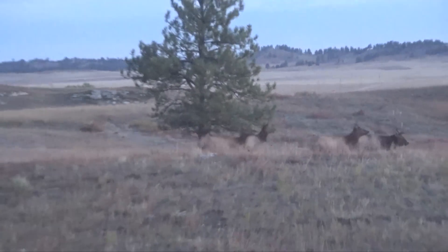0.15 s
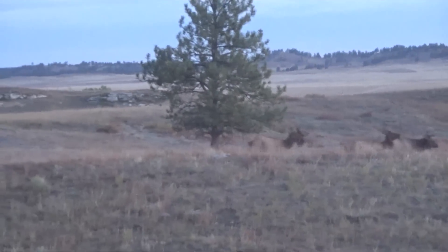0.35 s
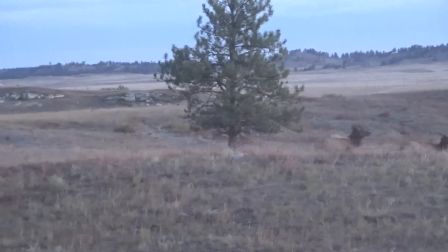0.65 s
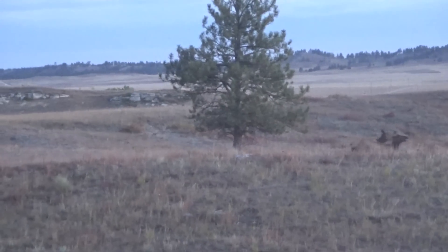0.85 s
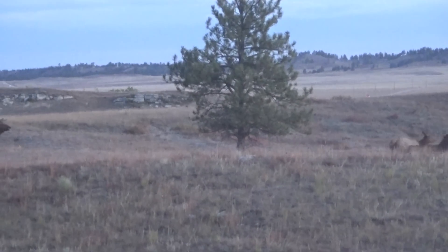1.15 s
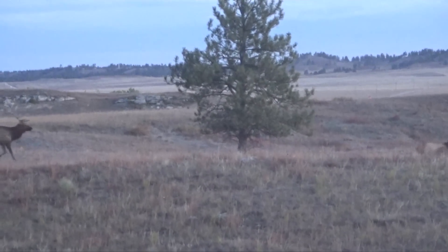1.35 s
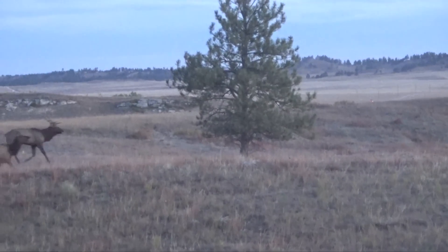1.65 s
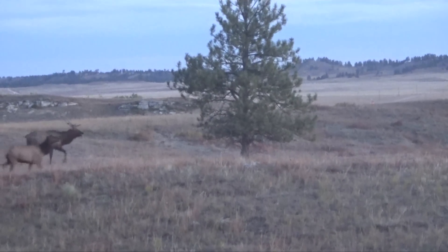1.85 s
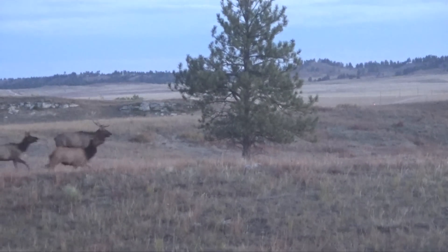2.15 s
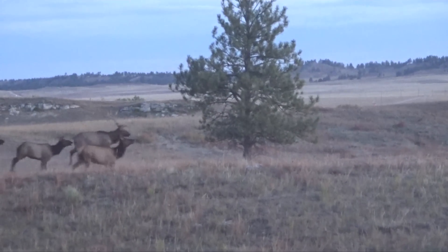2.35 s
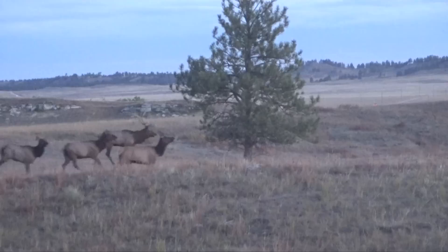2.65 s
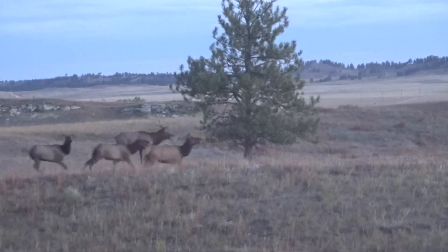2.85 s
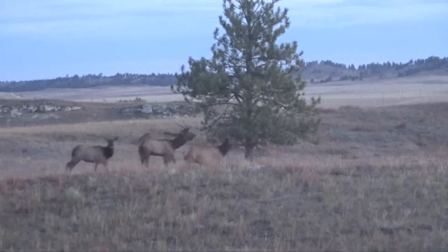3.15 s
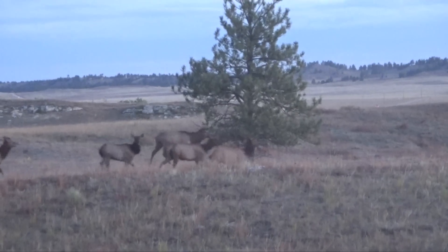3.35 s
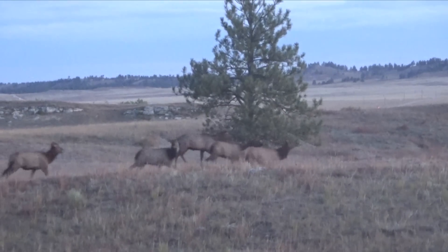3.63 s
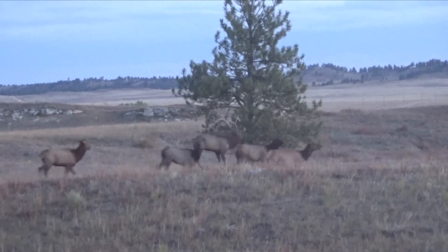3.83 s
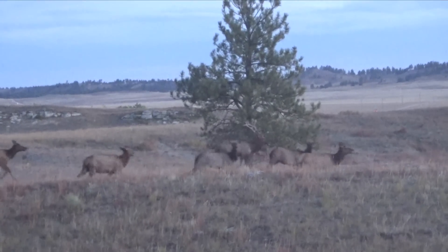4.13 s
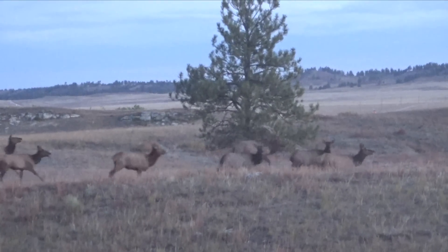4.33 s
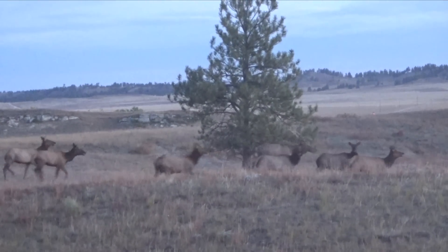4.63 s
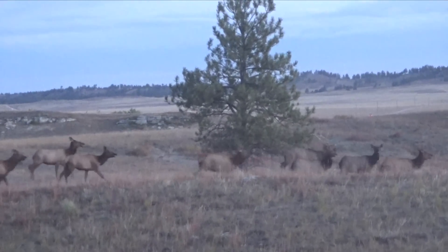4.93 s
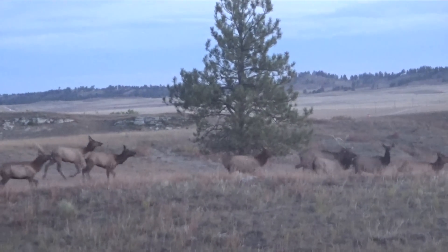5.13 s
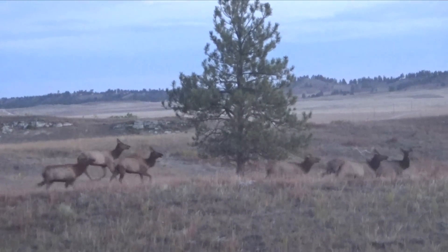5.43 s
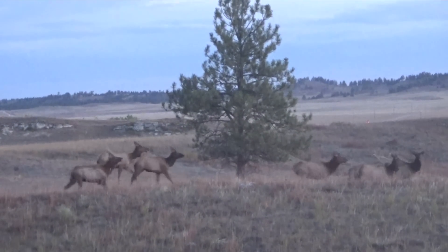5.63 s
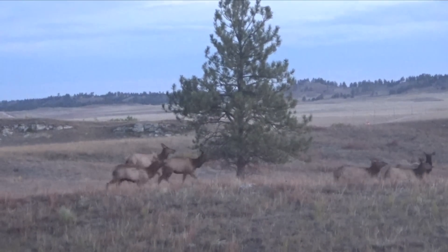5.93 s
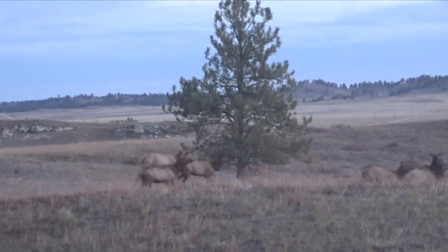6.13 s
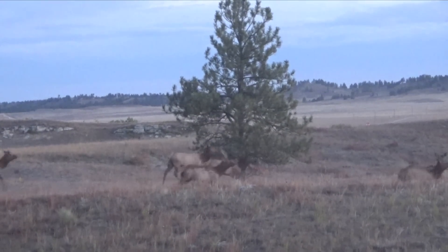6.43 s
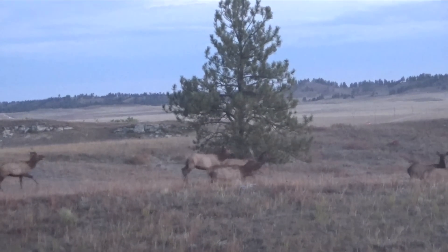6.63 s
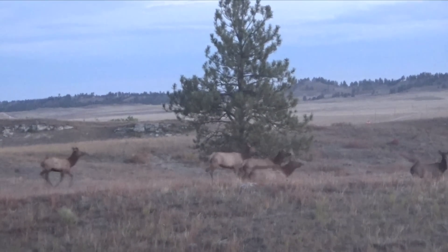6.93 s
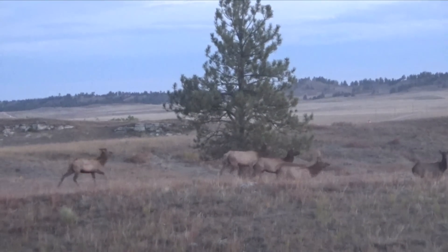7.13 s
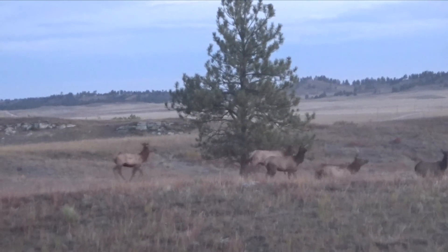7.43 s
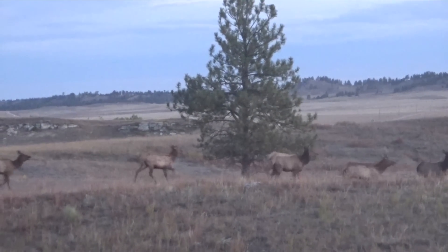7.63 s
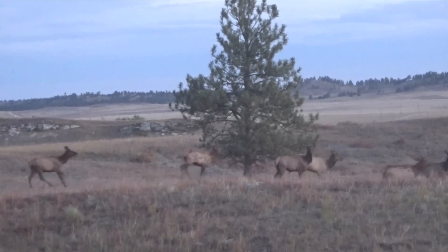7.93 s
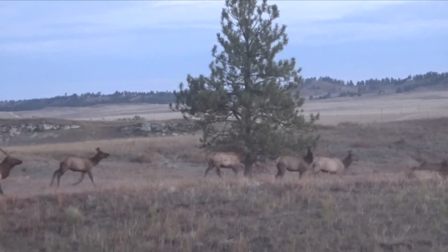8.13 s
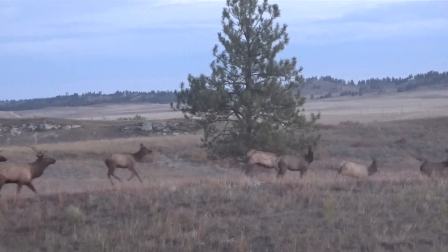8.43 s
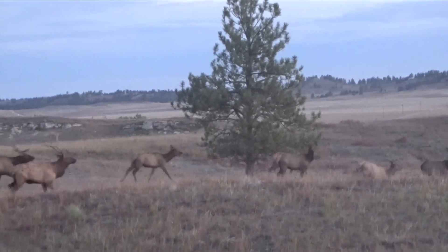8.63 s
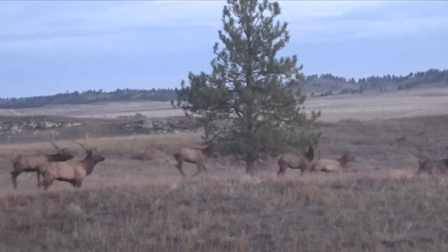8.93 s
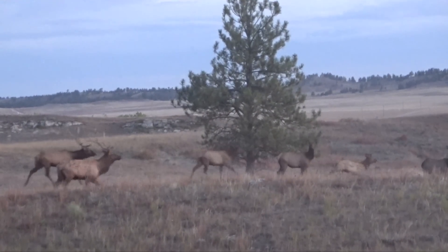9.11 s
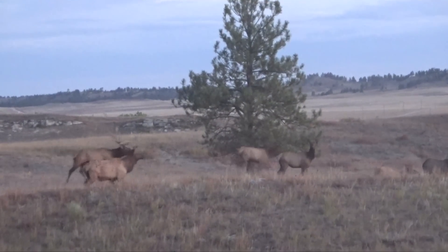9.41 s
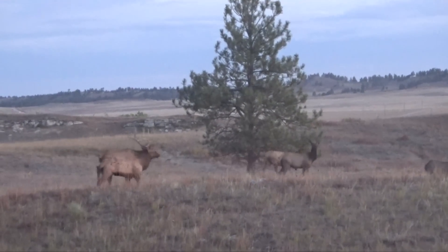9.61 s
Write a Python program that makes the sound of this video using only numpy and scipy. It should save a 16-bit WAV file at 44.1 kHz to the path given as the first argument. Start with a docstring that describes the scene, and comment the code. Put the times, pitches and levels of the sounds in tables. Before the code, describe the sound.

An elk herd trots through dry grass, cows and calves giving high nasal mews that sag at the end, with stalks snapping underfoot.

```python
"""Dry grassland, an elk herd trotting by on the left of a camera. Cows and calves mew: stacked overtones
sweep through fixed throat resonances and sag in pitch at the end. Hooves snap stalks (noise and a ringing knock),
scuff (bursts of grit) and thud (short low tones); the trot is a noise rumble with a crackling grass rustle.
A small bird whistles far off in gliding sine tones; the camera adds hiss and a thin high whine."""
import sys
import numpy as np
from scipy import signal
from scipy.fft import rfft, irfft, next_fast_len
from scipy.io import wavfile
from scipy.ndimage import uniform_filter1d, map_coordinates

SR = 44100
rng = np.random.default_rng(int(sys.argv[2]) if len(sys.argv) > 2 else 0)


def store_pcm(level_fs):
    """Save levels as 16-bit WAV."""
    pcm = np.round(np.clip(level_fs, -1, 1) * 32767).astype(np.int16)
    wavfile.write(sys.argv[1], SR, np.atleast_2d(pcm).T)


N = 430857  # length [samples]

# The mews, each a pair. First its ending:
# (effort as the drop starts [dB], effort as it ends [dB], chest at the start, at the drop, at the end [dB]);
# then its held part: rows of (time [s], pitch [Hz], effort [dB], mouth brightness [dB])
MEWS = [ ((-21, -39, -12.5, -1.5, 6), [(1.421, 1213, -37.5, 10), (1.538, 1333, -30, 5.5),
        (1.546, 1363, -19, 2), (1.65, 1351, -19, 2), (1.76, 1332, -16.5, -17), (1.845, 1175, -17, -26),
        (1.97, 1207, -24, -29), (2.11, 1297, -20, -6.5), (2.2, 1284, -17, -4)]), ((-36, -37, -4, -5, 7),
        [(2.301, 944, -45, -20), (2.389, 1083, -30, -5), (2.454, 1101, -34.5, 4), (2.56, 1075, -29, -30),
        (2.615, 1028, -34, -21), (2.7, 1011, -35, -11), (2.83, 968, -33, -25), (2.979, 1093, -33, 2),
        (3.129, 1052, -27, -20)]), ((-56, -50, 15, 20, 5), [(2.361, 1250, -53, 0), (2.422, 1224, -52, -7),
        (2.502, 1270, -49, -6)]), ((-32, -47, -1, 0.5, 20), [(2.84, 1210, -36.5, -10),
        (2.911, 1246, -28.5, -2), (3.047, 1309, -20, -13.5), (3.205, 1352, -21, -2.5),
        (3.29, 1336, -22.5, -4), (3.372, 1322, -17.5, -25), (3.43, 1264, -18.5, -19),
        (3.49, 1254, -19.5, -29), (3.532, 1177, -26, -9)]), ((-35, -44, -3, -9, 15), [(4.151, 958, -50, -5),
        (4.2, 1055, -42, -16), (4.27, 1119, -42, -18), (4.326, 1194, -31.5, -4), (4.402, 1178, -31, -9),
        (4.48, 1032, -32, -8), (4.56, 1023, -27, -14)]), ((-59, -54, 18, 3, 9), [(4.731, 917, -59, 7),
        (4.835, 954, -61, 10), (4.957, 942, -53, -7)]), ((-19.5, -45.5, 7, -8, 29.5),
        [(5.561, 1215, -44.5, -12), (5.665, 1323, -26.5, -11), (5.811, 1366, -23, 0),
        (5.93, 1359, -24.5, -3), (6.052, 1315, -22.5, -9.5), (6.156, 1366, -24, -3),
        (6.244, 1307, -20.5, -12), (6.35, 1285, -20, -9.5), (6.45, 1248, -16.5, -27)]),
        ((-25.5, -37.5, -9, -10, -13.5), [(6.501, 1686, -29, -10), (6.579, 1758, -39.5, 1),
        (6.677, 1717, -31, -9), (6.78, 1527, -43.5, 4), (6.9, 1395, -40, -19), (7.05, 1698, -31, -11),
        (7.182, 1780, -35.5, -5), (7.301, 1780, -34.5, 4), (7.377, 1693, -24, -10),
        (7.439, 1490, -30.5, -12)]), ((-34, -40.5, -2, 11.5, 22), [(7.082, 1159, -45, -7),
        (7.13, 1227, -39.5, 2), (7.234, 1256, -29.5, 1), (7.381, 1278, -23, -3), (7.47, 1240, -23.5, 1),
        (7.54, 1149, -29.5, -1), (7.601, 1066, -38, 5), (7.655, 1064, -36.5, -7)]),
        ((-46, -65, 7.5, 5.5, 4), [(8.291, 1002, -43, -6), (8.333, 1190, -49, 9), (8.461, 1203, -39.5, -2),
        (8.537, 1172, -41, 6), (8.62, 1110, -41, -30), (8.72, 1048, -38.5, -22), (8.78, 1010, -40, -22)]),
        ((-40, -46, 8, -2, -10), [(9.111, 485, -56, -25), (9.175, 740, -45, -20), (9.209, 880, -39, -11),
        (9.243, 916, -38.5, -35), (9.337, 905, -38, -32), (9.39, 871, -35.5, -18)]), ]
# The sag that ends each mew: (start time [s], start pitch [Hz], end time [s], end pitch [Hz])
DROPS = [(2.261, 1211, 2.313, 655), (3.19, 1000, 3.299, 401), (2.55, 1230, 2.618, 1140),
         (3.556, 1060, 3.6, 585), (4.623, 936, 4.669, 634), (5.12, 835, 5.198, 806),
         (6.477, 1160, 6.528, 610), (7.479, 1122, 7.592, 420), (7.677, 1030, 7.716, 640),
         (8.845, 995, 8.88, 855), (9.47, 709, 9.68, 315)]
# Which mews come from the nearest cow: (index in MEWS)
NEAR_COW = (0, 3, 6, 8)
# Resonances of throat and mouth: (frequency [Hz], gain [dB])
THROAT = [(500, -22), (900, -29.5), (1300, -8.5), (1700, -13.5), (2050, -13.5), (2400, -10.5), (2800, 3),
          (3050, -3), (3350, -16), (3650, -12), (4050, -3), (4400, -19), (4750, -33.5), (5300, -16),
          (5650, -23), (6000, -28), (6500, -54.5), (8000, -60.5)]
# The other callers' throats against hers: (frequency [Hz], added gain [dB])
OTHER_THROATS = [(1250, -0.5), (1450, -22), (1600, -18.5), (1760, 2.5), (2000, 1.5), (3000, -1), (3350, -7),
                 (3700, 3.5), (4050, -12.5), (4500, -1), (5200, 1), (5600, -0.5), (5950, -7), (6400, 2)]
# How much of the mouth brightness an overtone takes: (frequency [Hz], share [0-1])
MOUTH = [(2800, 0.024), (5300, 1), (6000, 0.3)]
# Stereo tilt of the callers: (frequency [Hz], left over right [dB])
HERD_SIDE = [(100, 2), (1290, 5), (2900, 4.5), (3600, 1.5), (8000, 0.7)]
# Stalks snapping under hooves:
# (time [s], level before trim [dB], knock frequency [Hz], crack level before trim [dB])
SNAPS = [(0.176, -16.5, 1310, -16), (0.1867, -28.5, 1270, -20), (0.5868, -26, 4350, -30),
         (0.6238, -30, 1700, -29), (0.647, -35, 2800, -27), (1.365, -21, 1590, -31),
         (3.6225, -35.5, 2620, -7), (4.0756, -39, 1200, -21), (4.174, -34, 2940, -25),
         (4.722, -33, 2770, -17), (5.2886, -35, 2240, -9), (5.89, -29, 2820, -26), (7.7468, -32, 1210, -30),
         (7.79, -35.5, 1840, -23), (7.9096, -33, 1630, -33), (8.098, -39.5, 2780, -28),
         (8.3621, -37, 1200, -3.5), (8.4994, -33, 1240, -25)]
# Hooves dragged through dirt and stalks:
# (time [s], level before trim [dB], length [s], centre frequency [Hz])
SCUFFS = [(0.694, -46, 0.042, 1690), (1.259, -45, 0.019, 1600), (1.361, -40, 0.05, 1570),
          (2.317, -43.5, 0.05, 1600), (4.288, -46, 0.16, 2150), (5.097, -50.5, 0.28, 1120),
          (7.581, -44.5, 0.09, 1110), (7.903, -50, 0.042, 2180), (8.15, -43, 0.12, 1850),
          (8.73, -42.5, 0.069, 1330)]
# Single hoof thuds: (time [s], level before trim [dB], frequency [Hz])
THUDS = [(0.236, -36, 151), (2.921, -36.5, 191), (3.036, -38, 230), (3.656, -30, 215), (4.303, -35, 172),
         (6.734, -29.5, 141), (8.137, -36, 110), (8.812, -35.5, 128)]
# The trot of the whole herd: (time [s], ground rumble before trim [dB], grass rustle before trim [dB])
TROT = [(0, -51, -54.5), (1.2, -48, -52.5), (2.5, -49, -52), (3.4, -48, -54.5), (4.3, -50.5, -53.5),
        (4.9, -52, -54.5), (5.3, -47.5, -55), (5.8, -53.5, -57.5), (6.8, -51.5, -54.5), (7.6, -53, -56.5),
        (8.2, -52, -57.5), (9, -53, -58.5), (9.77, -51.5, -57)]
# Colour of the ground rumble: (frequency [Hz], relative density [dB per Hz])
GROUND = [(15, -53.5), (28, -13.5), (100, 0.5), (180, 2.5), (290, -10.5), (500, -13), (700, -49.5)]
# Colour of the grass rustle: (frequency [Hz], relative density [dB per Hz])
GRASS = [(150, -30.5), (250, -3), (740, -3), (1640, -4.5), (2410, -8), (3280, -8), (5250, -16), (8270, -19),
         (15600, -43.5)]
# Stereo tilt of the hooves and trot: (frequency [Hz], left over right [dB])
FIELD_SIDE = [(30, 0), (200, 2), (600, 1.3), (2400, 2.2), (4400, .6), (9000, .2)]
# Bird whistles:
# (time [s], length [s], first pitch [Hz], turning pitch [Hz], last pitch [Hz], level [dB])
BIRD_WHISTLES = [(.99, .12, 7293, 7900, 8695, -63), (1.12, .1, 7983, 8251, 7094, -64),
                 (5.15, .16, 7291, 7911, 7157, -63), (3.12, .18, 8100, 7900, 7200, -62)]
# Colour of the hiss: (frequency [Hz], relative density [dB per Hz])
HISS = [(300, -5), (2000, 0.5), (6000, 3.5), (10000, 2.5), (15700, 0)]
# Level of the whine: (time [s], level [dB])
WHINE = [(0, -64), (1, -72), (1.9, -77.5), (6.8, -88.5), (7.6, -73), (8.5, -86), (9.2, -86), (9.5, -74)]

GLIDE_S = 0.05  # smoothing of the held pitch [s]
DULLING_DB = -5.5  # change by the end of the near cow's drop, per overtone above the third [dB]
BIRD_TURN = 0.3  # where a whistle's pitch turns [share of its length]
WHINE_HZ, TOP_HZ = 13264, 15750  # whine pitch and upper band limit [Hz]


def mews():
    """Steady vocal folds: each overtone takes the throat's gain at its own frequency, and the pitch sags last."""
    out = np.zeros(N)
    overtone = np.arange(1, 13)[:, None]
    for index, ((drop_db, end_db, *chest_dbs), held) in enumerate(MEWS):
        drop_s, drop_hz, end_s, end_hz = DROPS[index]
        last_bright_db = held[-1][3]
        ending = [(drop_s, drop_hz, drop_db, last_bright_db), (end_s, end_hz, end_db, last_bright_db)]
        t, edge = span(held + ending)
        pitch, effort_db, bright_db = curves(held + ending, t)
        chest_db = np.interp(t, [t[0], drop_s, end_s], chest_dbs)

        # held notes bend slowly, the drop keeps its quicker fall
        held_share = np.clip((drop_s - t) / GLIDE_S - 1, 0, 1)
        slow_pitch = uniform_filter1d(pitch, round(GLIDE_S * SR), mode="nearest")
        pitch += held_share * (slow_pitch - pitch)
        pitch = uniform_filter1d(pitch, 800, mode="nearest")
        pitch *= 1 + 0.0015 * wobble(40.3, size=len(t))
        hz = overtone * pitch

        chest_share = np.clip(np.log2(2000 / hz), 0, 1)  # none above 2 kHz, all of it below 1 kHz
        colour_db = chest_db * chest_share + bright_db * along(MOUTH, hz)
        if index in NEAR_COW:
            drop_progress = np.clip((t - drop_s) / (end_s - drop_s), 0, 1)
            colour_db += DULLING_DB * np.maximum(overtone - 3, 0) * drop_progress
        else:
            # from afar each overtone comes and goes
            fading_db = 2.0 * np.array([wobble(7.13, size=len(t)) for _ in overtone])
            colour_db += along(OTHER_THROATS, hz) + fading_db

        # moving air and ground echoes on the way
        flutter_db = 0.9 * np.array([wobble(25, size=len(t)) for _ in overtone])
        gain = amp(effort_db + flutter_db + along(THROAT, hz) + colour_db) * (hz < 9000)
        start_phase = rng.uniform(0, 2 * np.pi, overtone.shape)
        phase = overtone * np.cumsum(2 * np.pi * pitch / SR) + start_phase
        voice = np.sum(gain * np.sin(phase), axis=0)
        add(out, t[0], np.sqrt(2) * edge * voice)
    return sides(out, HERD_SIDE)


def hooves():
    """Single hoof sounds: stalks snap, dirt is scraped and the ground thuds."""
    out = np.zeros(N)
    t = np.arange(SR // 3) / SR
    snaps(out, t)
    scuffs(out, t)
    thuds(out, t)
    return sides(out, FIELD_SIDE)


def snaps(out, t):
    """A breaking stalk gives a ringing, noisy knock and a brighter crack that dies sooner."""
    attack = 1 - np.exp(-t / 0.00039)
    for s, db, hz, crack_db in SNAPS:
        noise = rng.standard_normal((2, len(t)))
        body = unit(steep_band(noise[0], hz, width=1.94))
        ring = 1.25 * np.sin(2 * np.pi * hz * t)
        knock = (body + ring) * amp(-60 * t / 0.026)  # down 60 dB in 26 ms
        crack = unit(band(noise[1], 6500, width=1.3)) * amp(crack_db + 7.5 - 60 * t / 0.016)
        add(out, s, amp(db - 6.5) * (knock + crack) * attack)


def scuffs(out, t):
    """A dragged hoof is a swell of uneven grit noise in two overlapping bands."""
    for s, db, length, hz in SCUFFS:
        grit = rng.standard_normal(len(t)) * amp(3.5 * wobble(150, size=len(t)))
        upper = unit(steep_band(grit, hz, width=1.3))
        lower_hz = 0.7 * hz
        lower = unit(steep_band(upper, lower_hz, width=1.7))
        swell = np.sqrt(np.abs(np.sin(np.pi * np.clip(t / length, 0, 1))))
        add(out, s, amp(db - 4.0) * (upper + lower) * swell)


def thuds(out, t):
    """Soft ground answers a hoof with a few cycles of a low tone that swell and die."""
    for s, db, hz in THUDS:
        u = t * hz / 1.85
        swell = u ** 2 * np.exp(-u ** 2)
        add(out, s, amp(db + 7.0) * swell * np.sin(2 * np.pi * hz * t))


def trot():
    """Many hooves blur into a lumpy noise rumble and a rustle of dry stalks."""
    ground_db, grass_db = curves(TROT, np.arange(N) / SR)
    lumps = rng.standard_normal(N) * amp(2.82 * wobble(14) + 0.57 * wobble(4))
    rustle = rng.standard_normal(N) * amp(1.2 * wobble(9) + 2.33 * wobble(60))
    rustle += 0.39 * unit(crackle(300, spread_db=2.0))
    near = amp(ground_db + 0.5) * unit(filtered(lumps, GROUND))
    near += amp(grass_db + 5) * unit(filtered(rustle, GRASS))

    # the spread-out part, in opposite polarity left and right
    far = rng.standard_normal((2, N))
    wide = amp(ground_db - 23) * unit(filtered(far[0], GROUND))
    wide += amp(grass_db - 21) * unit(filtered(far[1], GRASS))
    return sides(near, FIELD_SIDE) + wide * [[1], [-1]]


def crackle(rate, spread_db):
    """Dry stalks tick at random, rate a second: short damped rings, a few much bigger than the rest."""
    draw = rng.random((round(rate * N / SR), 4))
    t = np.arange(200) / SR
    hz = 1100 * 6 ** draw[:, 1:2]
    size = amp(-spread_db * np.log(draw[:, 2:3] + 0.012))
    size *= hz / 2000  # higher rings start louder and die sooner
    rings = size * np.exp(-t * hz / 3.9) * np.sin(2 * np.pi * hz * t)
    where = (draw[:, :1] * N).astype(int) + np.arange(len(t))
    return np.bincount(where.ravel(), rings.ravel(), N + len(t))[:N]


def bird():
    """Thin pure whistles at an even level, each gliding to a turning pitch and on to its last."""
    out = np.zeros(N)
    for s, length, first_hz, turn_hz, last_hz, db in BIRD_WHISTLES:
        t, edge = span([(s, first_hz), (s + BIRD_TURN * length, turn_hz), (s + length, last_hz)])
        hz = np.interp(t, [s, s + BIRD_TURN * length, s + length], [first_hz, turn_hz, last_hz])
        hz = uniform_filter1d(hz, 1500, mode="nearest")
        whistle = np.sin(np.cumsum(2 * np.pi * hz / SR))
        add(out, t[0], np.sqrt(2) * edge * amp(db) * whistle)
    return out


def camera():
    """Even noise hiss, nearly alike on both sides, and a faint high sine whine with a wandering phase."""
    t = np.arange(N) / SR
    whine_db = curves(WHINE, t)[0]
    whine = np.sqrt(2) * amp(whine_db) * np.sin(2 * np.pi * WHINE_HZ * t + 1.2 * wobble(12))
    noise = rng.standard_normal(N) + 0.06 * rng.standard_normal((2, N))
    return amp(-60.5) * unit(filtered(noise, HISS)) + whine


def amp(db):
    """Decibels to linear gain."""
    return 10 ** (np.asarray(db) / 20)


def unit(x):
    """x scaled to an RMS of one."""
    return x / np.sqrt(np.mean(x ** 2) + 1e-20)


def along(points, hz):
    """Reads (frequency [Hz], value) points on a log frequency axis."""
    f, v = np.transpose(points)
    return np.interp(np.log(hz + 1), np.log(f + 1), v)


def curves(rows, t):
    """The columns after the time, read at times t."""
    s, *cols = np.transpose(rows)
    return [np.interp(t, s, c) for c in cols]


def wobble(rate, size=N):
    """A smooth random curve, rate knots a second."""
    knots = rng.standard_normal(int(size * rate / SR) + 4)
    return map_coordinates(knots, [np.arange(size) * rate / SR])


def span(rows):
    """The times that a table covers, and 13 ms fades for its edges."""
    t = np.arange(rows[0][0], rows[-1][0], 1 / SR)
    return t, np.clip(np.minimum(t - t[0], t[-1] - t) / 0.013, 0, 1)


def add(track, s, sound):
    """Mixes a sound into the track at time s."""
    part = track[round(s * SR):][:len(sound)]
    part += sound[:len(part)]


def filtered(x, points):
    """x coloured by (frequency [Hz], gain [dB]) points."""
    m = next_fast_len(N + 8192)
    gain = amp(along(points, np.fft.rfftfreq(m, 1 / SR)))
    return irfft(rfft(x, m) * gain, m)[..., :N]


def band(x, hz, width):
    """A broad band-pass around hz, width being the ratio to either edge."""
    edges = [hz / width, min(hz * width, SR / 2.5)]
    return signal.sosfilt(signal.butter(1, edges, "band", fs=SR, output="sos"), x)


def steep_band(x, hz, width):
    """The same band-pass twice, for steeper skirts."""
    return band(band(x, hz, width), hz, width)


def sides(x, points):
    """A mono sound on both channels, tilted by (frequency [Hz], left over right [dB])."""
    half = np.array(points) * [1, 0.5]
    return np.array([filtered(x, half), filtered(x, half * [1, -1])])


def scene():
    """The herd, the bird and the camera's own noise together."""
    return mews() + hooves() + trot() + bird() + camera()


def record(dry):
    """Cuts everything above the band limit by 90 dB."""
    return filtered(dry, [(TOP_HZ, 0), (TOP_HZ + 30, -90)])


dry = scene()
out = record(dry)
store_pcm(out)
```